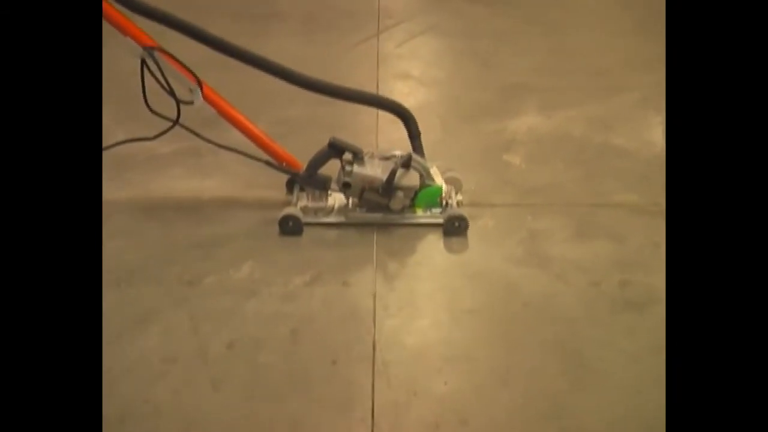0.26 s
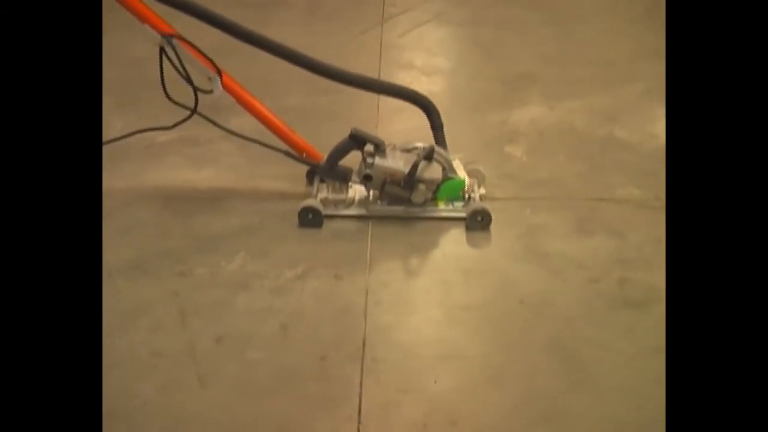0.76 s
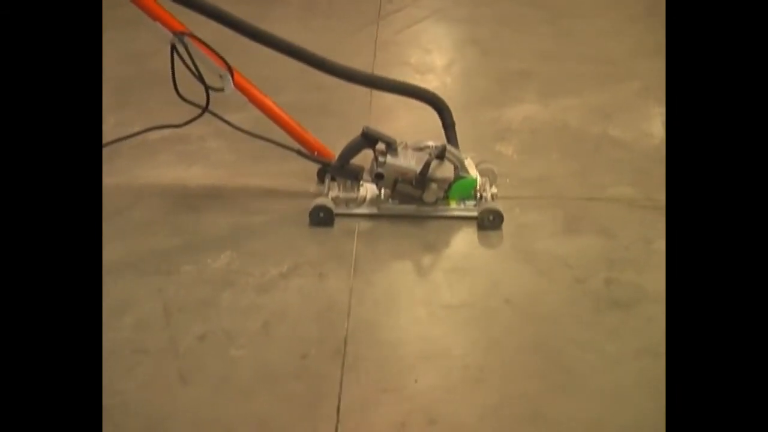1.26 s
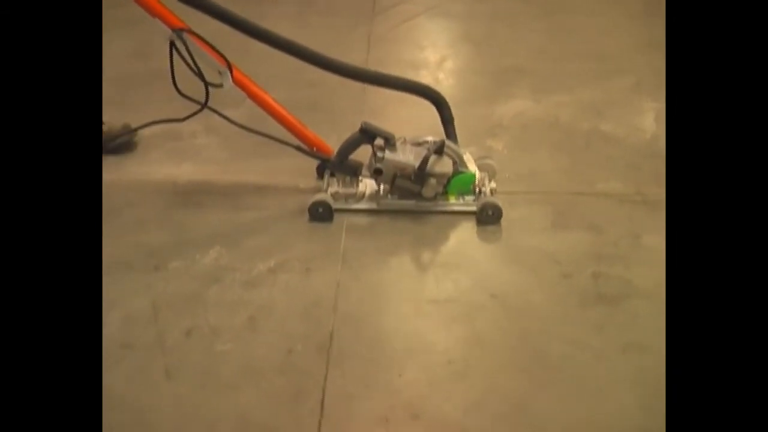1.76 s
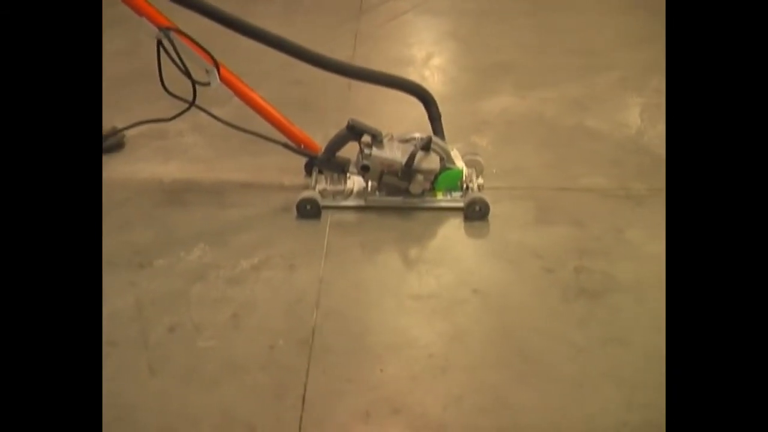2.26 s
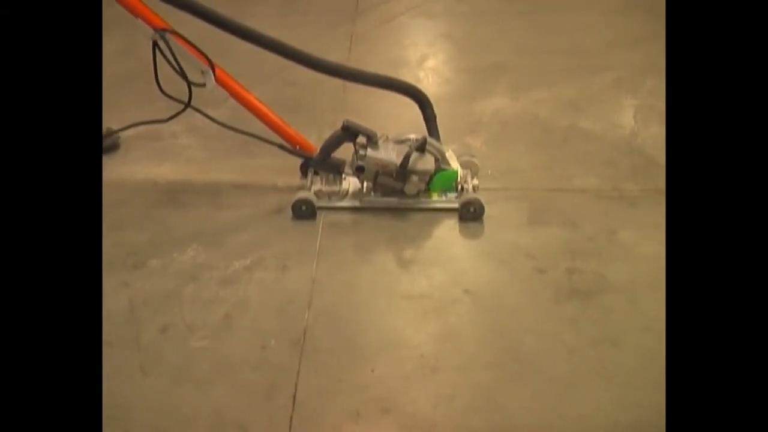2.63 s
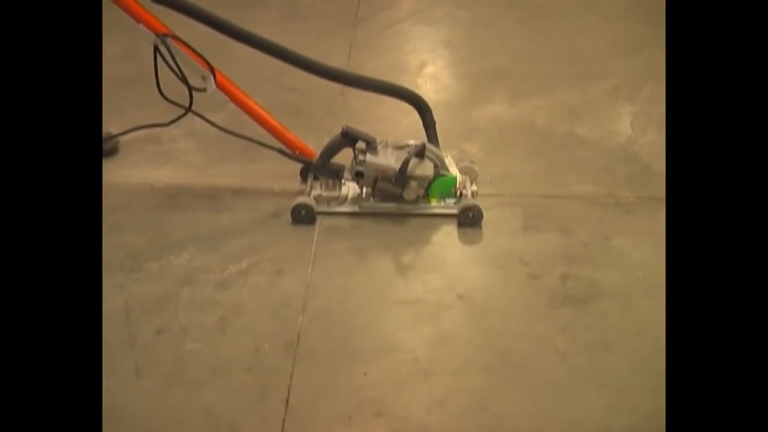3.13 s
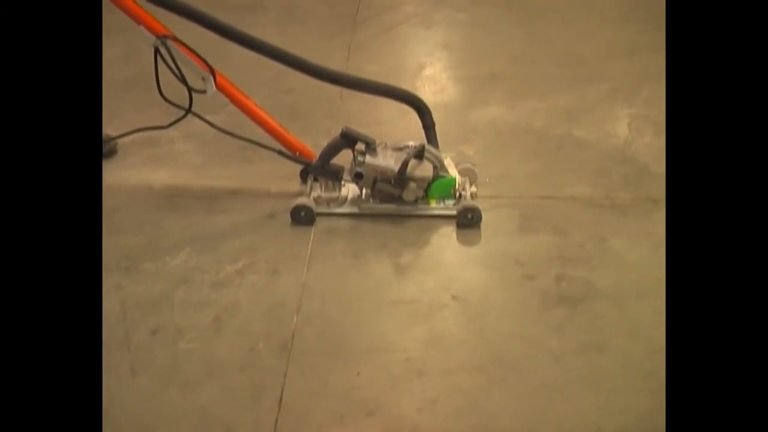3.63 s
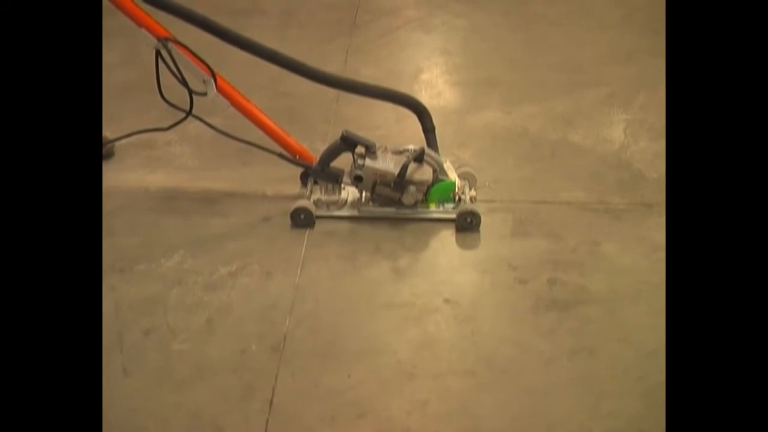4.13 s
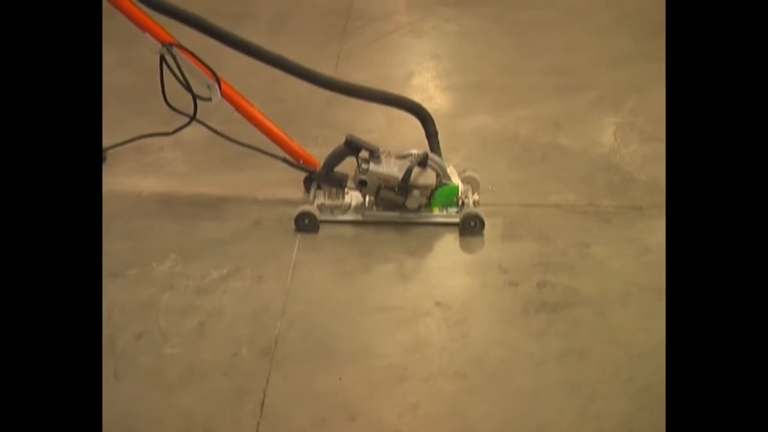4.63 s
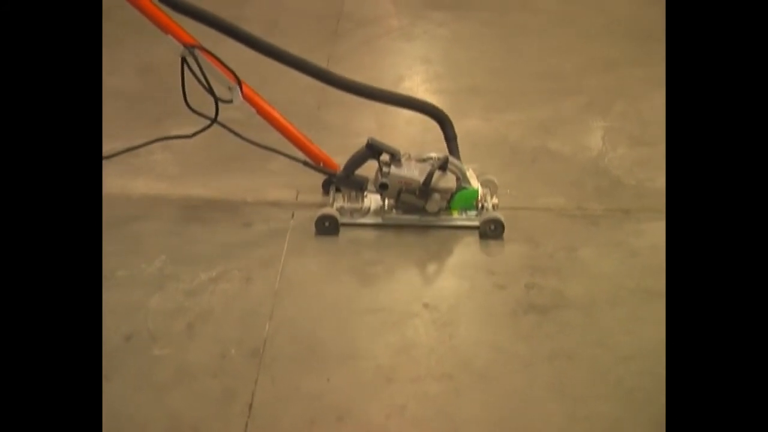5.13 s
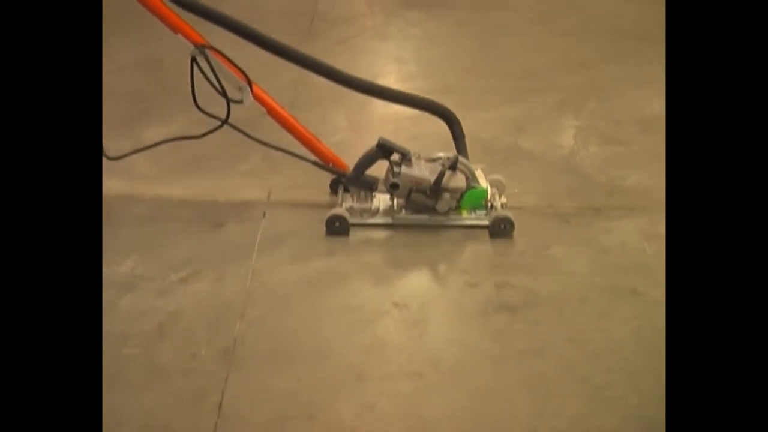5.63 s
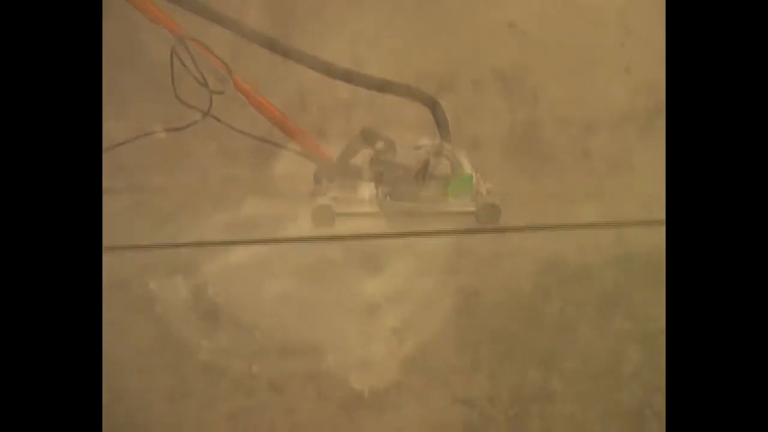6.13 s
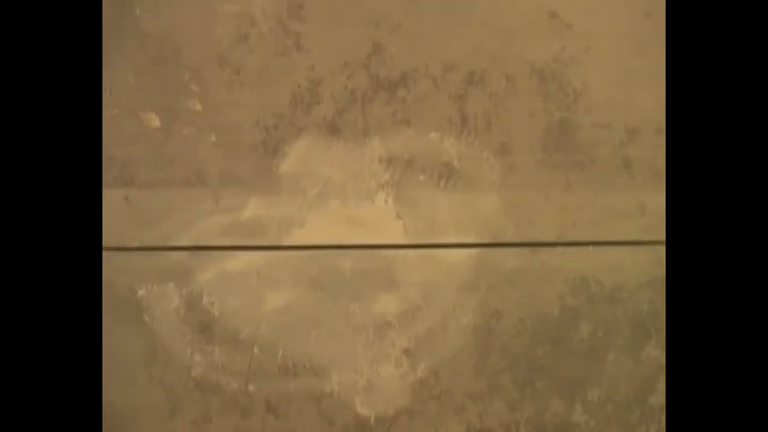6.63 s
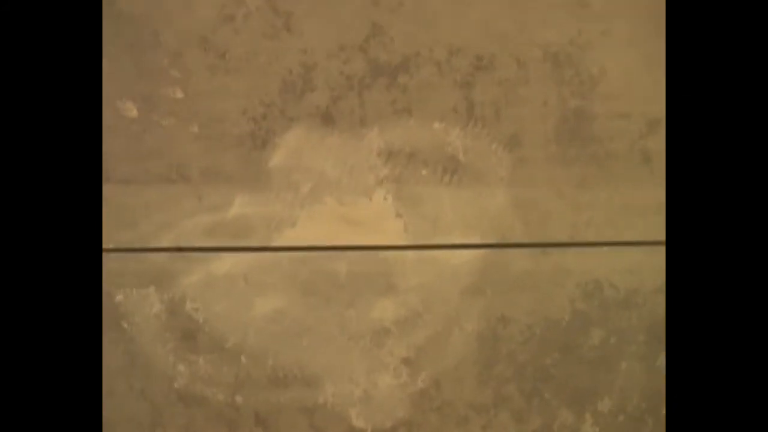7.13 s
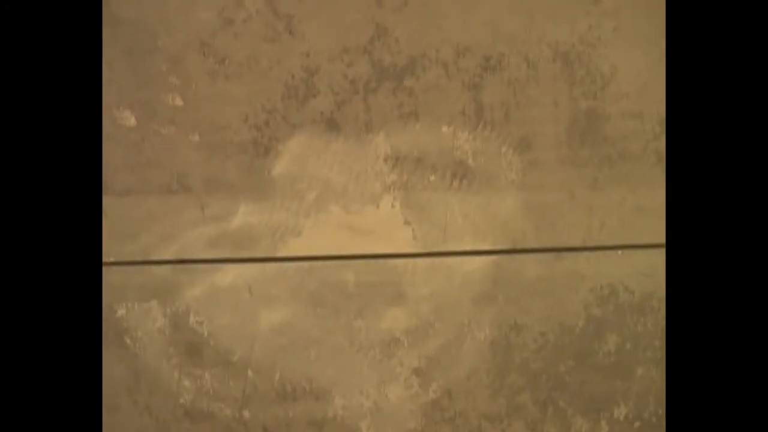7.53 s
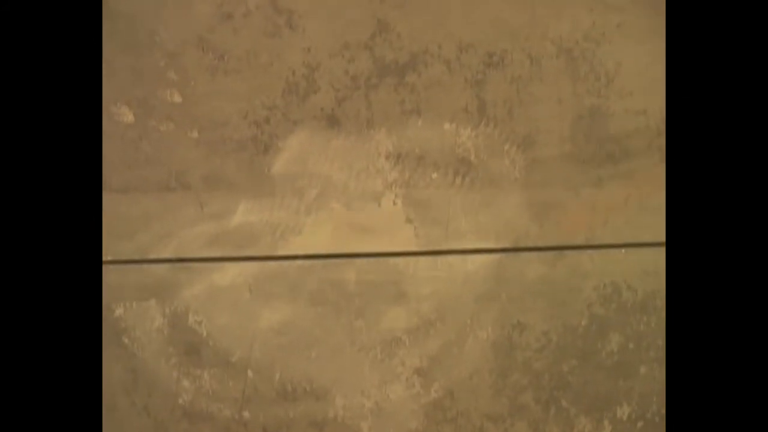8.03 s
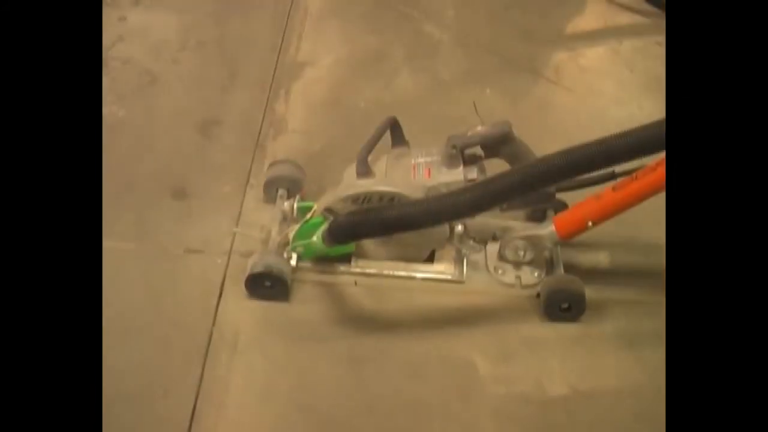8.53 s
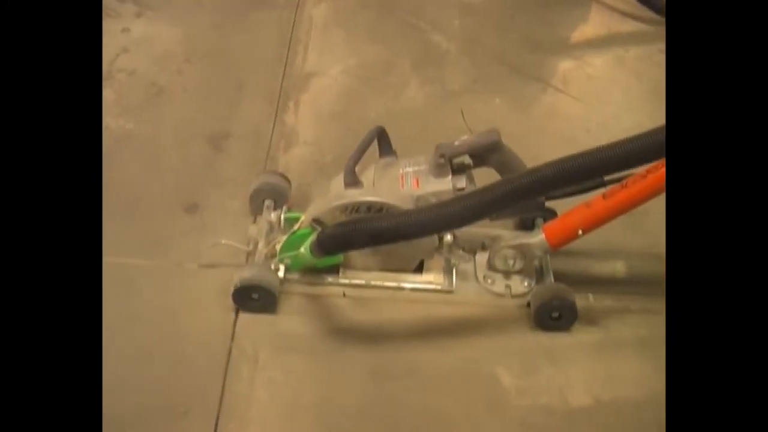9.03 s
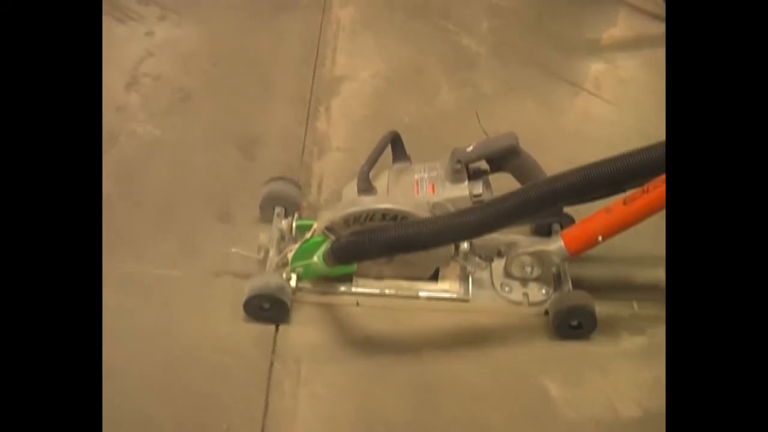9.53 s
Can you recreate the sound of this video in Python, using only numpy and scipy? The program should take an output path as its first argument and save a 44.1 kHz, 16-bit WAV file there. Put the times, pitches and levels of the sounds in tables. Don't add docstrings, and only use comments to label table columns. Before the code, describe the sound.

Loud steady concrete sawing in a large hall, with a metallic blade hiss, motor whine and a thin vacuum whistle. The middle part chatters with hard, fast knocks before the whine climbs again. After six seconds it dissolves into about a second and a half of near silence, with low hum, faint scraping grit and small clicks. Then the saw swells back, its pitch gently rising to the end.

```python
import sys
import numpy as np
from scipy import signal
from scipy.fft import rfft, irfft, next_fast_len
from scipy.io import wavfile
from scipy.ndimage import uniform_filter1d, map_coordinates

SR = 44100
rng = np.random.default_rng(int(sys.argv[2]) if len(sys.argv) > 2 else 0)


def volts(x):
    e = np.asarray(x, float) / 20
    return 10 ** e


def wrap_up_sound(samples):
    columns = np.atleast_2d(samples).T
    tamed = np.clip(columns, -1, 1)
    steps = np.round(tamed * 32767).astype(np.int16)
    wavfile.write(sys.argv[1], SR, steps)


N = 430857
TIME = np.arange(N) / SR


def unit(x):
    return x / np.sqrt(np.mean(x ** 2) + 1e-20)


def along(points, hz):
    f, v = np.transpose(points)
    return np.interp(np.log(hz + 1), np.log(f + 1), v)


def curves(rows, outside=None):
    s, *cols = np.transpose(rows)
    return np.array([np.interp(TIME, s, c, outside, outside) for c in cols])


def bumps(rows, half_s):
    return sum(height * np.exp(-((TIME - s) / half_s) ** 2) for s, height in rows)


def wobble(rate_hz):
    knots = rng.standard_normal(int(N * rate_hz / SR) + 4)
    return map_coordinates(knots, [TIME * rate_hz])


def filtered(x, response):
    m = next_fast_len(N + 8192)
    return irfft(rfft(x, m) * response(np.fft.rfftfreq(m, 1 / SR)), m)[..., :N]


def modes(table):
    def response(f):
        total = 0
        for k, (centre, width, db) in enumerate(table):
            resonance = 1j * f * width / (centre * centre - f * f + 1j * f * width)
            total = total + (-1) ** k * volts(db) * resonance
        return total
    return response


def colour(spectrum):
    return lambda hz: volts(along(spectrum, hz))


def noise(patchy_db):
    z = signal.stft(rng.standard_normal((2, N)), nperseg=512)[2]
    field = uniform_filter1d(rng.standard_normal(z.shape[1:]), 5, 0)
    field = uniform_filter1d(field, 12, 1)
    return signal.istft(z * volts(patchy_db * unit(field)), nperseg=512)[1][:, :N]


def stereo(pair, response, alike):
    def mid_side(hz):
        turn = np.arccos(np.clip(along(alike, hz), -1, 1)) / 2
        return response(hz) * np.array([np.cos(turn), np.sin(turn)])
    mid, side = filtered(pair, mid_side)
    return unit(np.array([mid + side, mid - side]))


def tone(turns, drift, flutter_db, apart=0):
    phase = 2 * np.pi * (turns + drift * wobble(25))
    size = np.sqrt(2) * volts(flutter_db * wobble(14))
    return size * np.sin([phase + apart / 2, phase - apart / 2])


# start_s, end_s
FADE_OUT_S, FADE_IN_S = (5.9, 6.44), (7.985, 8.525)


def views():
    first = np.interp(TIME, FADE_OUT_S, [1, 0])
    second = np.interp(TIME, FADE_IN_S, [0, 1])
    return np.sin(np.pi / 2 * np.array([first, second]))


def by_view(pair):
    return np.where(TIME < FADE_IN_S[0], *pair)


# start_s, peak_db, ring_hz, thud_db
TICKS = [
    (6.5444, -49, 3620, -19),
    (6.608, -35, 5170, -5),
    (6.6877, -45, 4990, -19),
    (6.8313, -52, 3910, -25),
    (7.0294, -47, 4000, -24),
    (7.2524, -45, 5230, -25),
    (7.8027, -46, 4940, -20.5),
]


def ticks():
    out, t = np.zeros(N + SR), np.arange(SR // 20) / SR
    for s, db, hz, thud_db in TICKS:
        ring = np.sin(2 * np.pi * hz * t) * volts(-60 * t / .025)
        click = 1.2 * rng.standard_normal(len(t)) * volts(-60 * t / .0097)
        thud = volts(thud_db) * np.sin(2 * np.pi * 860 * t) * volts(-60 * t / .012)
        out[round(s * SR):][:len(t)] += volts(db + 2.0) * (ring + click + thud)
    return filtered(out[:N], lambda f: 1 / (1 + 1j * f / 7000) ** 2)


# time_s, level_db
DISSOLVE = [(5.85, -36), (6.05, -1), (6.4, -1.5), (8, 2), (8.3, 3), (8.5, -28)]
# time_s, grit_db
SWEEP = [(6.44, -46.5), (6.55, -46.5), (6.6, -48.5), (6.88, -48), (7.02, -51.5), (7.3, -51.5), (7.7, -55),
         (7.99, -58)]
# freq_hz, level_db
LAMPS = [(118.6, -63.5), (359, -72), (583, -78), (239, -75.5)]
# freq_hz, level_db
HALL = [(15, -52), (25, -24), (70, -11), (119, -7.5), (305, -11.5), (362, -14), (476, -21), (595, -15.5),
        (1500, -20), (1950, -18), (3300, -120)]
GRIT = [(590, -27), (1000, -12.5), (1220, -46), (1340, -19.5), (2330, -12.5), (2740, -8.5), (3550, -5),
        (6650, -9), (8170, -7), (13300, -16)]
# freq_hz, likeness
ALIKE_HALL = [(60, 0.39), (180, 0.89), (550, 0.9), (1650, 0.46), (4970, 0.71), (15000, 0.2)]


def hall():
    pan_db, top_hz = 4, 13650
    grit_db, = curves(SWEEP)
    hum = sum(volts(db) * tone(hz * TIME, drift=.02, flutter_db=-0.5) for hz, db in LAMPS)
    scuff_db = bumps([(7.62, 3.5)], half_s=.05)
    air_db = -61 + 0.3 * (grit_db - grit_db.mean()) + scuff_db
    air = volts(air_db) * stereo(noise(patchy_db=1.0), colour(HALL), ALIKE_HALL)
    unevenness_db = 0.72 * wobble(70) + 1.5 * wobble(900) + 1.0 * wobble(15)
    grains = noise(patchy_db=0.5) * volts(unevenness_db)
    grit = volts(grit_db) * stereo(grains, colour(GRIT), ALIKE_HALL)
    sides = volts([[pan_db / 2], [-pan_db / 2]])
    quiet = hum * volts([[1.4], [-1.4]]) + air + sides * (grit + ticks())
    return volts(curves(DISSOLVE, outside=-150)) * filtered(quiet, lambda hz: hz < top_hz)


# time_s, blade_pass_hz, level_db, left_right_phase_rad
VACUUM = [(0, 4540, -78, 2.4), (.8, 4570, -52, 2.3), (1.8, 4575, -58, 2.3), (2.4, 4510, -46, 0.78),
          (3.1, 4503, -43.5, 0.9), (4.2, 4450, -47, 0.92), (4.8, 4485, -49, 1.07), (5.5, 4550, -43, 1.1),
          (5.7, 4570, -62, 1.5), (6.4, 4570, -94, 1.5)]


def vacuum():
    hz, blade_db, apart_rad = curves(VACUUM)
    turns = np.cumsum(hz) / SR
    whistle = volts(blade_db) * tone(turns, drift=.035, flutter_db=1.3, apart=apart_rad)
    shaft = volts(-65.5) * tone(turns / 9, drift=.05, flutter_db=3, apart=.5)
    return (TIME < VACUUM[-1][0]) * whistle + views()[0] * shaft


# time_s, grinding_db, cart_chatter_db, bite_depth_0_to_1
CUT = [(0, -28.5, -41, 0.55), (.47, -27.5, -41, 0.3), (.84, -31, -45, 0.35), (.97, -27.5, -39.5, 0.32),
       (1.45, -28.5, -43.5, 0.4), (1.8, -28.5, -38, 0.05), (1.9, -30.5, -32.5, 0.16),
       (2.2, -33, -34.5, 0.31), (3, -32, -33, 0.28), (3.7, -30, -33.5, 0.28), (4.1, -29.5, -35.5, 0.45),
       (4.6, -29, -41, 0.56), (5.2, -28.5, -41, .32), (6.4, -30, -44, .33), (8, -28, -45, .3),
       (8.7, -27.5, -44, .33), (9.2, -27.5, -43, 0.38), (9.77, -28, -48.5, 0.23)]


def cut():
    return curves(CUT)


# freq_hz, likeness
ALIKE_LOW = [(40, .4), (100, .55), (300, .55), (600, .8)]


def bass_stereo(pair, response):
    return stereo(pair, response, ALIKE_LOW)


# time_s, speed_hz
MOTOR = [(0, 219.8), (0.2, 226.4), (0.65, 247.9), (1.0, 272.4), (1.5, 287.3), (1.85, 275.7), (2.2, 252.0),
         (2.6, 234.8), (3.3, 225.0), (4.0, 213.9), (4.5, 221.4), (4.85, 248.7), (5.3, 277.9), (5.7, 288.1),
         (6.45, 300.4), (7.9, 236.7), (8.7, 237.4), (9.77, 261.6)]


def motor_speed():
    inertia_s = .2
    return uniform_filter1d(curves(MOTOR)[0], round(inertia_s * SR), mode="nearest")


ORDERS = [1, 2, 3, 4, 12, 32]
# full_db, full_speed_hz, loss_db_per_hz_slower, left_right_phase_rad
TONES = [(-60, 265, 0.5, 0.13), (-54.5, 292, .2, 0.099), (-57, 244, 0.4, 0.14), (-47, 252, 0.2, 0.076),
         (-42.5, 267, .12, 0.71), (-44, 294, 1.3, .33)]
# time_s, level_db
SLOT = [(2.8, -98), (3.1, -50), (3.7, -51.5), (4.3, -51), (4.55, -71)]
# time_s, level_db
FACING = [(0, -9), (.4, -2), (1, 0), (2, -1), (4.4, 1), (5.2, 0.5), (6.4, 1.5)]
# freq_hz, level_db
RUMBLE = [(15, -65.5), (25, -32), (108, -18.5), (147, -15), (275, -9), (334, -10.5), (395, -13), (494, -10),
          (653, -3.5), (700, -4.5), (910, -55), (1540, -120)]


def motor(motor_hz):
    turns, chatter_db = np.cumsum(motor_hz) / SR, cut()[1]
    facing_db, = curves(FACING)
    lines = volts(curves(SLOT, outside=-150)[0]) * tone(16 * turns, drift=.05, flutter_db=1.5)
    for order, (full_db, full_hz, db_per_hz, apart_rad) in zip(ORDERS, TONES):
        level_db = full_db + db_per_hz * np.minimum(motor_hz - full_hz, 0) + facing_db
        line = tone(order * turns, drift=.04, flutter_db=1.5, apart=apart_rad)
        lines = lines + volts(level_db) * views()[0] ** 1.7 * line
    low_db = by_view((-54, -52)) + 0.16 * (chatter_db - chatter_db.mean())
    low = volts(low_db) * views().sum(axis=0)
    mains = volts(-71.5) * tone(120 * TIME, drift=.051, flutter_db=-1.0) * (low > 1e-5)
    rumble = bass_stereo(noise(patchy_db=2.0), colour(RUMBLE))
    return lines + mains + low * volts([[.8], [-.8]]) * rumble


# time_s, peak_db
HARD = [(1.862, -20), (1.897, -17), (1.984, -15.5), (2.109, -15.5), (2.182, -19.5), (2.239, -18.5),
        (2.355, -16), (2.414, -18.5), (2.513, -16.5), (2.553, -17.5), (2.653, -19), (2.672, -16.5),
        (2.796, -20.5), (2.877, -18.5), (2.981, -17), (3.001, -16), (3.085, -18), (3.105, -17),
        (3.232, -19), (3.253, -16.5), (3.358, -16.5), (3.443, -17.5), (3.549, -18), (3.636, -20),
        (3.7, -18.5), (4.031, -17.5), (4.052, -20), (4.27, -20.5), (4.338, -21), (4.446, -20.5)]
# time_s, peak_db
HARD_NEAR = [(8.366, -26), (8.386, -25), (8.426, -24), (8.666, -25.5), (8.825, -23), (8.922, -23.5),
             (8.981, -23), (9.077, -24), (9.156, -24), (9.175, -21.5)]


def knocks(turns, scatter_db, chatter_db):
    usual_db = 11.5, 14
    at = np.flatnonzero(np.diff(np.floor(turns)) > 0)
    chance = rng.standard_normal((len(at), 2))
    when = at + chance[:, 0] * .0005 * SR
    size_db = np.minimum(scatter_db * chance[:, 1], 1)
    for s, db in HARD + HARD_NEAR:
        turn = np.argmin(np.abs(at - s * SR))
        when[turn] = s * SR
        size_db[turn] = db - chatter_db[at[turn]] - usual_db[int(s > FADE_IN_S[0])]
    blows = np.zeros(N)
    blows[np.clip(when.astype(int), 0, N - 1)] = volts(size_db)
    return unit(blows)


def struck(blow, part):
    pair = np.array([blow, 0.56 * np.roll(blow, 130)])
    return np.sqrt(1 - part) * noise(patchy_db=1.0) + np.sqrt(part) * pair


# freq_hz, likeness
ALIKE = [(300, .9), (640, .97), (1500, .95), (2600, .95), (3800, .985), (5500, .988), (7500, .974),
         (9200, .99), (10300, .97), (12000, .985), (13600, .93), (15000, .9)]


def saw_stereo(pair, response):
    return stereo(pair, response, ALIKE)


# freq_hz, width_hz, level_db
CART = [(872, 117, -2.5), (969, 316, -3), (1180, 267, -4.5)]
DECK = [(759.8, 50, -5.5)]
WHEELS = [(195, 190, 0)]


def cart(blow, share, chatter_db):
    def body(f):
        band = f ** 3 / (f ** 3 + 600 ** 3) / (1 + (f / 1350) ** 6)
        return -1j * np.abs(modes(CART)(f)) * band + modes(DECK)(f)
    drone = saw_stereo(struck(blow, share), body)
    thump = bass_stereo(struck(blow, 0.47 * share), lambda f: modes(WHEELS)(f) ** 2)
    return volts(chatter_db + 0.88 * wobble(9)) * (drone + volts(-29.5) * thump)


# freq_hz, width_hz, level_db
GUARD = [(1552, 106, 3), (1480, 288, -5.5)]
# time_s, rise_db
FLARES = [(.2, 0), (.7, 3), (1, 0), (1.13, 3.5), (1.42, 6), (1.72, 4), (1.9, 7), (2.19, 5), (2.36, 4),
          (2.66, 3), (3.19, 4), (4.25, 2), (5.16, 4.5), (5.55, 1.5), (5.69, 6), (5.82, 4), (6.3, 4),
          (6.4, 3), (8.27, 5.5), (8.4, 3.5), (8.65, 0), (8.8, 5), (8.93, 4), (9.1, 3.5), (9.4, -1)]


def guard(blow, share, swell):
    ring = saw_stereo(struck(blow, 0.54 * share) * swell(-0.13, 0.26), modes(GUARD))
    level_db = by_view((-39.5, -40)) + bumps(FLARES, half_s=.034) + 0.72 * wobble(12)
    return ring * volts(level_db)


# freq_hz, level_db
ROAR_A = [(1000, -32), (1700, -4), (1950, -0.5), (2220, -4.5), (2670, -0.5), (3180, -6.5), (3370, -6.5),
          (3770, -11), (4100, -4.5), (5330, -8.5), (9020, -120)]
ROAR_B = [(1000, -31), (1700, -1.5), (1820, -5), (2140, 1.5), (2400, -6), (2770, -7), (3180, -3),
          (3710, -12.5), (4100, -20), (5330, -43), (9020, -120)]


def windage(motor_hz, blow, share, chatter_db, swell, bite_lead):
    free_db = bumps([(0.95, 3)], half_s=.15)
    level_db = by_view((-38, -40.5)) + 0.066 * (motor_hz - 260)
    level_db = level_db + 0.34 * (chatter_db - chatter_db.mean()) + 0.63 * wobble(7) + free_db
    sound = 0
    for view, spectrum in zip(views(), (ROAR_A, ROAR_B)):
        air = swell(bite_lead, 0.25) * struck(blow, 0.18 * share)
        sound = sound + view * saw_stereo(air, colour(spectrum))
    return volts(level_db) * sound


# freq_hz, width_hz, level_db
BLADE_A = [(4480, 22, -4), (4860, 94, -5), (5480, 140, -3.5), (5774, 113, 1.5), (6390, 126, 0),
           (6950, 140, -0.5), (7660, 170, -7), (8340, 164, -2), (10030, 260, -5), (11060, 280, -9)]
BLADE_B = [(4160, 66, -0.5), (4870, 200, -2.5), (5600, 250, -9.5), (6330, 110, 0.5), (7000, 200, -8.5),
           (7660, 150, -8), (8100, 150, -8), (8430, 170, 0.5), (9400, 150, -4), (9940, 220, -4),
           (10960, 90, -2.5), (12740, 200, -4), (13400, 200, -7)]
# freq_hz, level_db
HISS_A = [(2120, -43), (3600, -11), (3840, -13), (4860, -3), (6110, -9), (8350, -2), (9020, -5),
          (14700, -15.5)]
HISS_B = [(2120, -35), (3600, -11.5), (4100, -9), (5930, -9.5), (8220, -2.5), (9040, -7.5), (13000, -10.5),
          (14900, -10)]


def grinding(grind_db, swell, bite_lead):
    bite = swell(bite_lead + 0.042 * wobble(30), 0.84) * volts(1.38 * wobble(260))
    sound = 0
    for view, peaks, broad in zip(views(), (BLADE_A, BLADE_B), (HISS_A, HISS_B)):
        plate = lambda f: colour(broad)(f) * (0.5 + np.abs(modes(peaks)(f)))
        sound = sound + view * saw_stereo(bite * noise(patchy_db=1.0), plate)
    return volts(grind_db + 0.48 * wobble(8)) * sound


# time_s, bite_lead_over_knock_turns
LEAD = [(0, .05), (.9, .08), (1.2, .35), (1.8, .47), (2.2, .24), (3, .25), (4, .08), (6.5, .16),
        (7.9, -.02), (8.6, .18), (9.77, .47)]


def saw(motor_hz):
    gear = 4.75
    grind_db, chatter_db, depth = cut()
    depth = np.clip(depth, 0, .97)
    loose_db, rattling_db = by_view((-49.5, -57)), by_view((-34, -38))
    share = 0.82 * np.clip((chatter_db - loose_db) / (rattling_db - loose_db), 0, 1)
    knock_lead_turns = by_view((.15, .97))
    blade = np.cumsum(motor_hz) / SR / gear + knock_lead_turns
    bite_lead, = curves(LEAD)

    def swell(lead, gain):
        return 1 + gain * depth * volts(2.5 * wobble(18)) * np.cos(2 * np.pi * (blade + lead))

    blow = knocks(blade + .01, scatter_db=3.3, chatter_db=chatter_db)
    rattle = cart(blow, share, chatter_db) + guard(blow, share, swell)
    roar = windage(motor_hz, blow, share, chatter_db, swell, bite_lead)
    return rattle * views().sum(axis=0) + roar + grinding(grind_db, swell, bite_lead)


def scene():
    motor_hz = motor_speed()
    return hall() + vacuum() + motor(motor_hz) + saw(motor_hz)


def band_limit(x):
    return signal.sosfilt(signal.butter(12, 15130, fs=SR, output="sos"), x)


def record(dry):
    top_hz = 15130
    mix = filtered(dry, lambda hz: hz < top_hz)
    return band_limit(mix)


dry = scene()
out = record(dry)
wrap_up_sound(out)
```